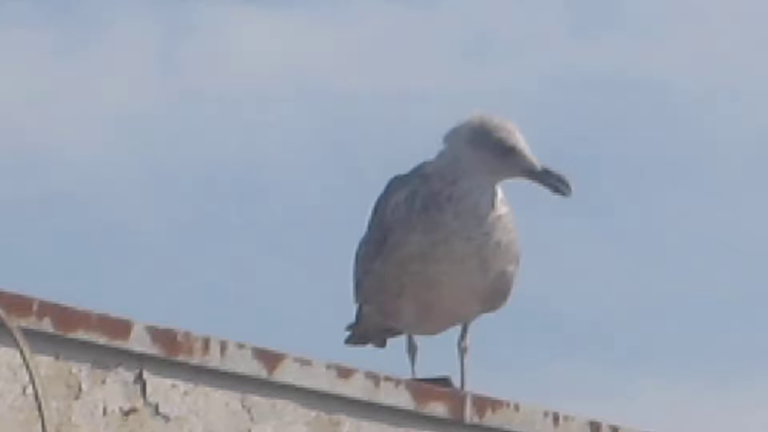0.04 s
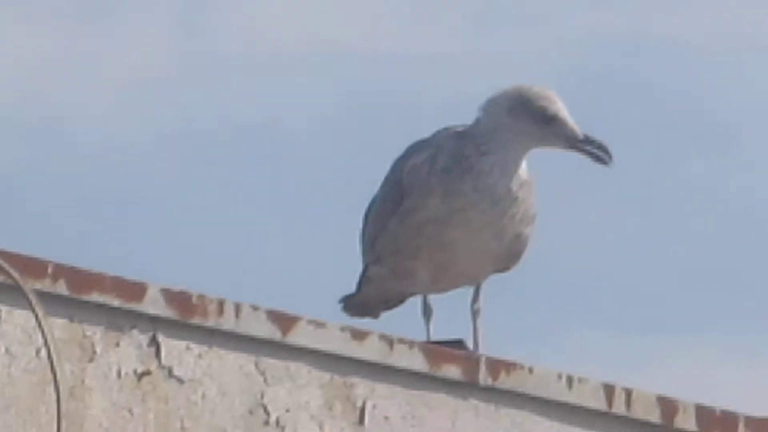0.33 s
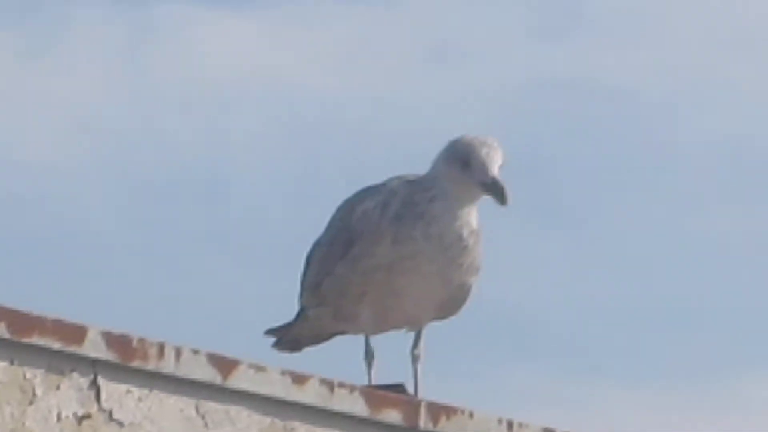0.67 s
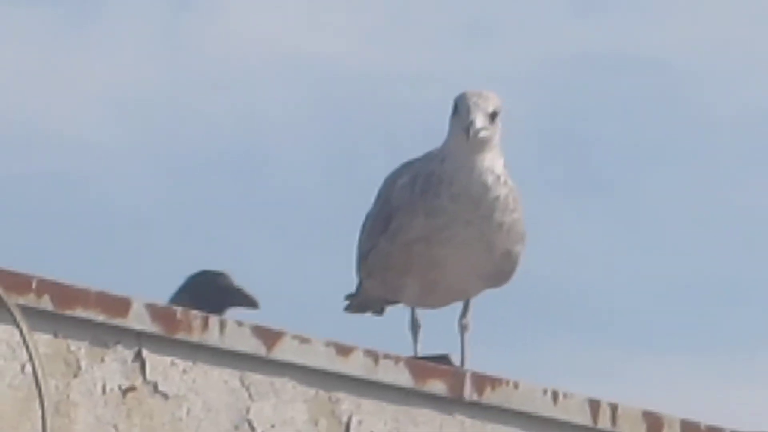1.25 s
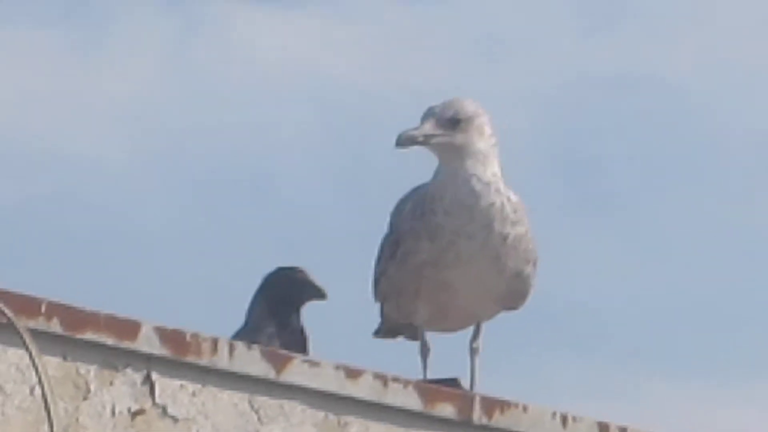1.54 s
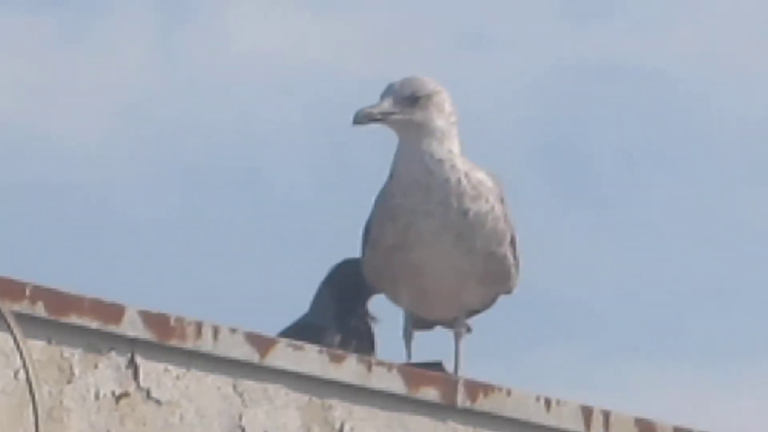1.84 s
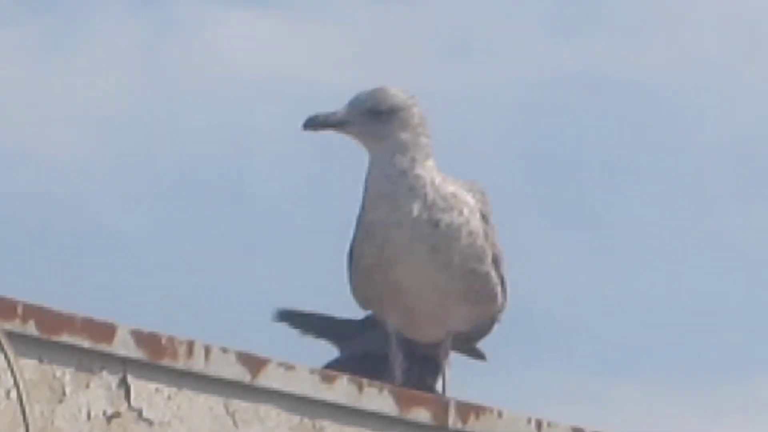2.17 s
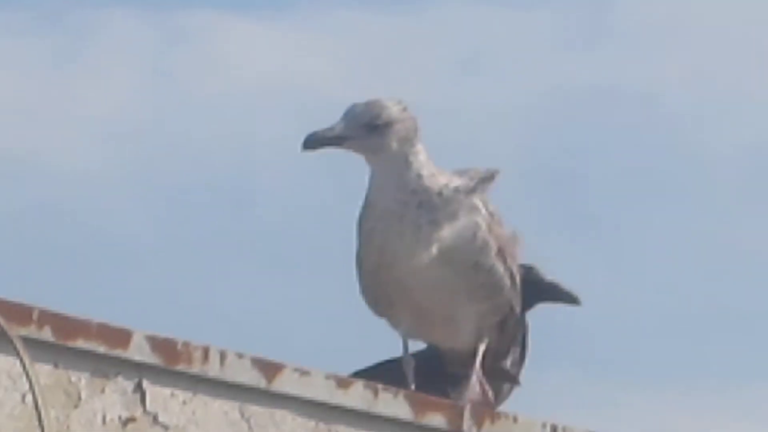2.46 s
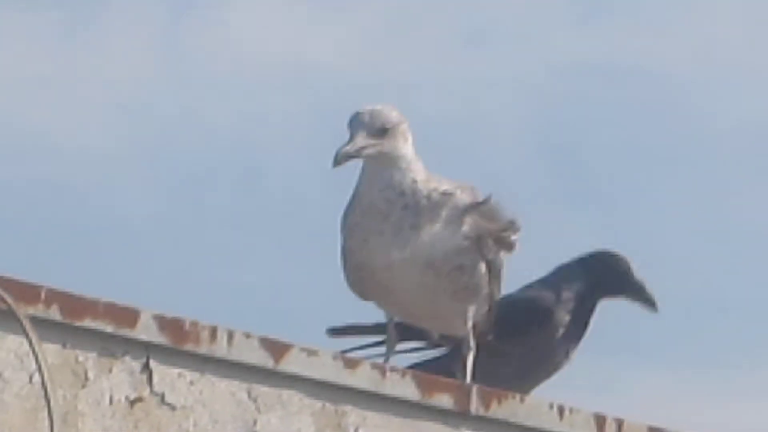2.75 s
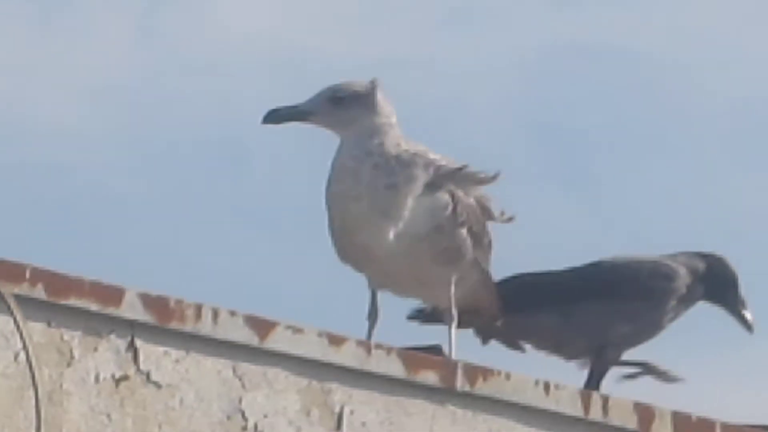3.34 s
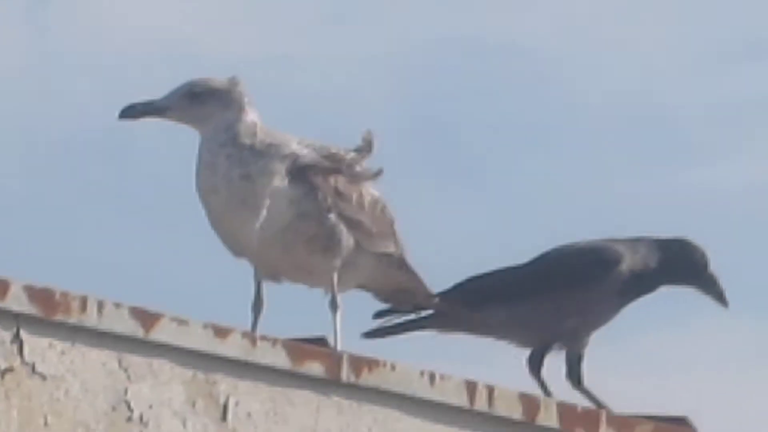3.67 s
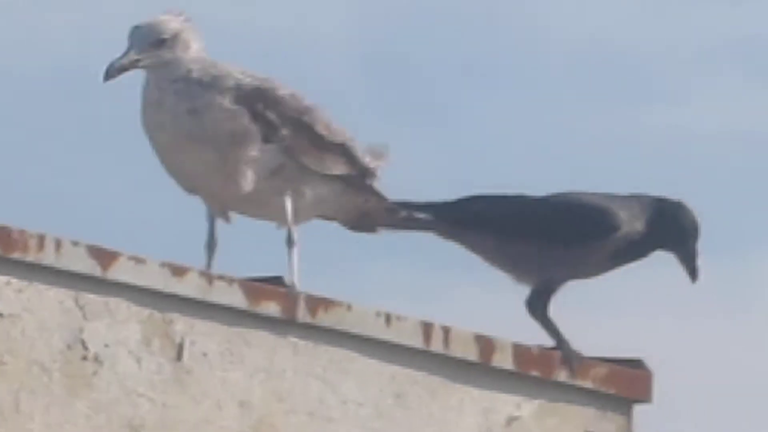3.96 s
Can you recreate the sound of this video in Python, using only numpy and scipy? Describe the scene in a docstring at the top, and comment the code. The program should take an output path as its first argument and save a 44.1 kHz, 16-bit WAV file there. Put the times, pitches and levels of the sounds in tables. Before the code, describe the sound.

Outdoors among rooftops, a young gull squeals in a shrill, breaking voice. Gusts then rumble and thump right on the microphone, and the gull squeals once more through them, with faint hiss and far-off noise behind.

```python
"""Among rooftops, with the microphone out in the wind. A young gull on a roof gives two thin squeals; its voice
breaks from one register to the next, rasping at the breaks, and the buildings echo it. Right at the microphone,
gusts shed eddies, the hardest of them overloading it. Behind lie a distant outdoor wash and a fine hiss; the
whole background sinks for a moment after the hardest buffets."""
import sys
import numpy as np
from scipy import signal
from scipy.fft import rfft, irfft
from scipy.io import wavfile
from scipy.ndimage import uniform_filter1d

SR = 44100
rng = np.random.default_rng(int(sys.argv[2]) if len(sys.argv) > 2 else 0)


def pcm_store(signal):
    """Save signal as 16-bit PCM."""
    levels = np.round(np.clip(np.atleast_2d(signal), -1, 1) * 32767)
    wavfile.write(sys.argv[1], SR, levels.astype(np.int16).T)


N = 176400
T = np.arange(N) / SR
CUTOFF_HZ = 15800   # top of the microphone's range

# The gull on its roof, register by register. Each row: start and end in seconds, pitch at start, middle
# and end in Hz, levels of harmonics 1-4 in dB, level change over the note in dB, roughness from 0 to 1.
REGISTERS = [ (0.27, .289, 3400, 3980, 3980, -52.5, -44, -78, -95, 0, 0.47),
             (0.299, 0.324, 3900, 3840, 3815, -30, -57, -77, -95, 14, 0.091),
             (0.322, 0.347, 3780, 3740, 3640, -34, -35, -72, -85, -3, 0),
             (0.341, .358, 1492, 1442, 1425, -70, -36, -34.5, -46, 6, 0.26),
             (.355, .404, 2827, 2810, 2777, -31, -45, -62, -64, -1, 0),
             (.356, .402, 1420, 1410, 1405, -80, -55, -50, -70, 3, 0.1),
             (0.407, 0.561, 4757, 4700, 4665, -31.5, -57.5, -70, -101, -2, .04),
             (.563, .660, 4055, 4033, 4020, -30, -49.5, -79, -90, 7.5, 0.09),
             (0.659, 0.778, 3520, 3472, 3440, -27, -45.5, -60, -62, -6.5, 0.029),
             (0.789, 0.801, 4050, 3940, 3830, -47, -41, -78, -95, -2, .25),
             (0.814, 0.828, 3700, 3370, 3380, -50, -37, -78, -95, 9, 0.13),
             (0.84, 0.865, 1343, 1322, 1340, -70, -29, -34.5, -51, 1, 0.13),
             (.870, 0.897, 1322, 1250, 1225, -75, -33, -40, -66, 8.5, 0.18),
             (2.428, 2.444, 3330, 3670, 4130, -47, -42, -49, -86, 16.5, 0.75),
             (2.444, 2.463, 3137, 3154, 3177, -29.5, -34.5, -46.5, -79, -6, 0.069),
             (2.471, 2.521, 3200, 3090, 2940, -39, -57, -73, -82, 10, 0.15),
             (2.471, 2.521, 3900, 3840, 3710, -33, -54, -62, -80, 9.5, 0.16),
             (2.501, 2.517, 4240, 4170, 4140, -29, -49, -75, -97, -9, 0.23),
             (2.519, 2.553, 2950, 2940, 2990, -45, -44, -51, -76, 1, .25),
             (2.549, 2.608, 4680, 4790, 4750, -45, -48.5, -73, -95, 1.5, 0.017),
             (2.617, 2.68, 4850, 4900, 4850, -42, -62.5, -78, -95, -2.5, 0),
             (2.679, 2.722, 4190, 4155, 4100, -40, -53.5, -69.5, -95, -14.5, 0.02),
             (2.719, 2.821, 4090, 4040, 4110, -60, -54.5, -95, -100, -15.5, 0.085),
             (2.829, 2.925, 4530, 4410, 4240, -65.5, -55.5, -101.5, -100, 7.5, 0.28),
             (2.916, 2.99, 4260, 3880, 3200, -67.5, -67.5, -90.5, -100, -20, 0.11)]
def gull_squeals():
    """Each register is a gliding tone with a few harmonics; roughness shakes its pitch and strength."""
    attack_s, release_s, throat_top_hz = 0.0076, 0.016, 15000
    out, jitter, shimmer, waver = np.zeros(N), wander(hz=500), wander(hz=500), wander(hz=45)
    for start, end, hz0, hz1, hz2, db1, db2, db3, db4, change_db, rough in REGISTERS:
        on = (T > start - attack_s) & (T < end + release_s)
        t = T[on]
        progress = np.clip((t - start) / (end - start), 0, 1)
        glide = np.polyval(np.polyfit([0, .5, 1], [hz0, hz1, hz2], 2), progress)
        hz = glide * (1 + 0.021 * rough * jitter[on] + 0.00089 * waver[on])
        phase = 2 * np.pi * np.cumsum(hz) / SR
        gate = np.clip(.5 + (t - start) / attack_s, 0, 1) * np.clip(.5 + (end - t) / release_s, 0, 1)
        envelope = np.sin(gate * np.pi / 2) ** 2 * from_db(change_db * (progress - .5))
        envelope *= 1 + rough * shimmer[on]
        for k, db in enumerate([db1, db2, db3, db4, db4 - 3, db4 - 6], 1):
            if k * hz1 < CUTOFF_HZ:
                throat_loss = np.sqrt(1 + (k * hz / throat_top_hz) ** 8)
                out[on] += envelope * from_db(db) * np.sin(k * phase) / throat_loss
    return out


# Breaks in the voice. Each row: time in seconds, half length in seconds, level in dB.
VOICE_BREAKS = [(.353, 0.0058, -41.5), (.407, .005, -44.5), (.565, 0.0035, -53), (2.444, .007, -46),
                (2.513, 0.018, -47), (2.548, .007, -60.5), (2.832, 0.0028, -53.5)]
# Colour of the rasp. Each row: frequency in Hz, relative level in dB.
RASP_SPECTRUM = [(1800, -41), (2900, -13.5), (4200, 1), (6500, 0.5), (8500, -12), (11000, -14),
                 (15000, -31)]
def gull_rasps():
    """A short burst of noise where the voice breaks between registers."""
    return swells(VOICE_BREAKS) * noise(RASP_SPECTRUM)


# The same bird's side tones, and faint tones at the sum of two overlapping pitches. Each row: start and end in
# seconds, first and last pitch in Hz, level in dB.
SIDE_TONES = [(0.336, 0.356, 6600, 6500, -43), (0.358, 0.399, 7050, 7000, -43),
              (.385, 0.426, 3730, 3540, -41), (.409, 0.428, 8370, 8280, -48), (.43, 0.57, 3800, 3650, -58),
              (.49, 0.552, 2880, 2830, -54), (0.612, 0.646, 3540, 3510, -46),
              (0.614, 0.663, 7650, 7500, -52), (0.623, 0.68, 2870, 2810, -49.5),
              (2.519, 2.556, 6650, 6550, -47.5), (2.52, 2.54, 8120, 8150, -49),
              (2.54, 2.562, 7680, 7650, -46), (2.801, 2.838, 3600, 3520, -54.5)]
def gull_side_tones():
    """The other half of the syrinx sounds weak glides along with the main voice; where two voices overlap, a
    faint tone sounds at the sum of their pitches."""
    fade_s = 0.004
    out, shake = np.zeros(N), 1 + 0.0044 * wander(hz=500)
    for start, end, hz0, hz1, db in SIDE_TONES:
        on = (T > start - fade_s) & (T < end + fade_s)
        t = T[on]
        gate = np.clip(.5 + np.minimum(t - start, end - t) / fade_s, 0, 1)
        hz = np.interp(t, [start, end], [hz0, hz1]) * shake[on]
        out[on] += from_db(db) * gate * np.sin(2 * np.pi * np.cumsum(hz) / SR)
    return out


# Slaps off the neighbouring buildings. Each row: delay in seconds, level against the direct call in dB.
WALL_ECHOES = [(.16, -27), (.28, -30)]
def rooftops(call):
    """The call arrives with quick scatter from the roof, then dull slaps and a tail from the walls."""
    roof_decay_s, tail_t60_s = 0.027, 1.1
    t = T[:SR]
    roof = rng.standard_normal(SR) * np.exp(-t / roof_decay_s) * (t > .004)
    tail = rng.standard_normal(SR) * from_db(-60 * t / tail_t60_s) * (t > .025)
    echo = from_db(-16) * roof / np.linalg.norm(roof) + from_db(-26.5) * tail / np.linalg.norm(tail)
    dull = butter(call, 5000, "low")
    slaps = sum(from_db(db) * np.interp(T - delay, T, dull) for delay, db in WALL_ECHOES)
    return call + signal.fftconvolve(call, echo)[:N] + slaps


def eddy(t, hz):
    """Pressure of a vortex passing the microphone: a sharp trough between two soft shoulders."""
    u = (2 * np.pi * hz * t) ** 2
    return (u - 1) / (1 + u) ** 2


# Gusts right on the microphone. Each row: time in seconds, half length in seconds, strength in dB.
GUSTS = [(.55, .015, -58), (1.125, 0.03, -24), (1.172, 0.0072, -17), (1.283, 0.037, -20),
         (1.425, 0.026, -19), (1.49, 0.036, -24), (1.595, 0.017, -25.5), (1.672, 0.02, -19.5),
         (1.755, 0.03, -40.5), (1.985, 0.026, -16), (2.047, 0.003, -20), (2.175, 0.054, -36),
         (2.255, 0.036, -24), (2.36, 0.037, -30), (2.465, 0.019, -20.5), (2.54, 0.032, -16),
         (2.605, 0.019, -13.5), (2.69, 0.044, -17.5), (2.78, 0.033, -21), (2.865, 0.022, -17),
         (2.93, 0.034, -19), (3.04, 0.0041, -23.5), (3.10, 0.028, -21), (3.218, 0.015, -18),
         (3.27, 0.018, -19), (3.325, 0.046, -17), (3.418, 0.015, -14.5), (3.525, 0.017, -15.5),
         (3.572, 0.028, -15.5), (3.665, 0.056, -20.5), (3.735, 0.026, -21.5), (3.788, 0.0098, -16),
         (3.835, 0.016, -16), (3.89, 0.031, -18.5), (3.965, 0.06, -15.5)]
# Eddy sizes. Each row: centre in Hz, level against a reference gust in dB, growth in dB per dB of gust.
EDDY_SIZES = [(36.4, -16, 0.2), (72, -4.5, 1.4), (127, -4, 0.81), (209, -4, 1.47), (324, -9.5, 2.52),
              (545, -18, 3.02)]
def gusts():
    """Eddies of all sizes pass at random as lopsided troughs; strong gusts favour the small ones."""
    eddies_per_s, spread_db, lean_spread, reference_db, smooth_s = 150, 4.5, 0.94, -14.5, .035
    strength = swells(GUSTS) / from_db(reference_db)
    t, out = T[:SR // 10] - T[SR // 20], np.zeros(N)
    for hz, db, growth in EDDY_SIZES:
        passes = (rng.random(N) < eddies_per_s / SR) * from_db(spread_db * rng.standard_normal(N))
        leans = lean_spread * rng.standard_normal(N)
        u = 2 * np.pi * hz * t
        troughs = signal.fftconvolve(passes, eddy(t, hz), "same")
        swings = signal.fftconvolve(passes * leans, 2 * u / (1 + u ** 2) ** 2, "same")
        churn = rms_one(troughs + swings)
        power = uniform_filter1d(churn ** 2, int(smooth_s * SR))
        even_churn = churn / np.sqrt(power + 0.016)   # evened out, so the gust sets the level
        out += from_db(reference_db + db) * strength ** growth * even_churn
    return out


# The hardest single buffets. Each row: time in seconds, peak ahead of the port in dB, centre in Hz.
BUFFETS = [(1.121, -10.5, 168), (1.137, -13, 216), (1.174, -11.5, 252), (1.25, -10, 217), (1.205, -14, 325),
           (1.272, -4.5, 278), (1.282, -3, 155), (1.315, -13, 232), (1.437, 0, 352), (1.442, -9.5, 596),
           (1.666, -14, 550), (1.953, -4, 390), (1.97, -9.5, 580), (1.985, -0.5, 390), (2.021, -19, 417),
           (2.046, -15.5, 248), (2.25, -19, 324), (2.587, -2.5, 260), (2.605, -0.5, 300), (2.616, -4, 600),
           (2.673, -10, 520), (2.723, -11.5, 650), (2.862, -9.5, 418), (2.935, -14, 330), (3.091, -15, 297),
           (3.209, -13, 220), (3.22, -6.5, 241), (3.264, -2, 278), (3.324, -1.5, 430), (3.340, -7, 750),
           (3.425, -16, 435), (3.570, -10, 520), (3.667, -11.5, 380), (3.826, -1, 465), (3.873, -8.5, 700),
           (3.888, -5, 650), (3.95, -9, 690)]
# Low rumble of the breeze between gusts. Each row: frequency in Hz, relative level in dB.
BREEZE_SPECTRUM = [(20, -7.5), (50, 1.5), (110, -0.5), (170, -11), (260, -27.5)]
# Its rise and fall. Each row: time in seconds, level in dB.
BREEZE_LEVEL = [(.1, -66), (.5, -61), (1.0, -42), (1.2, -47), (1.9, -38.5), (2.6, -36.5), (3.2, -35.5),
                (3.46, -50.5), (4.0, -39.5)]
def wind():
    """Breeze, gusts and buffets press on the microphone's port, which passes mainly the low end."""
    port_low_hz, port_high_hz = 36.4, 1644
    breeze = level(BREEZE_LEVEL) * noise(BREEZE_SPECTRUM)
    buffets = sum(from_db(db) * eddy(T - s, hz) for s, db, hz in BUFFETS)
    pressure = butter(breeze + gusts() + buffets, port_low_hz, "high", order=1)
    return butter(pressure, port_high_hz, "low", order=3)


# Colours of the hiss and the rustles behind the gull. Each row: frequency in Hz, relative level in dB.
HISS_SPECTRUM = [(2000, -17), (4000, 3), (7000, -0.5), (10000, -1.5), (12500, -2.5), (15500, -9.5)]
RUSTLE_SPECTRUM = [(2000, -9.5), (4000, 5), (7000, -3.5), (11000, -1.5), (13000, -9.5), (15500, -19)]
# Rise and fall of the hiss. Each row: time in seconds, level in dB.
HISS_LEVEL = [(.07, -66), (.3, -65.5), (.52, -61), (.64, -58.5), (.75, -53), (.85, -56), (.91, -50.5),
              (.97, -57), (1.1, -55), (1.18, -59.5), (1.235, -47.5), (1.31, -58.5), (1.43, -54.5),
              (1.45, -70), (1.59, -61), (1.67, -67), (1.75, -58), (1.84, -68), (1.95, -54.5), (2.0, -68),
              (2.09, -67), (2.14, -50.5), (2.21, -65.5), (2.37, -55), (2.55, -84), (2.65, -68), (2.9, -76),
              (3.25, -66.5), (3.45, -77), (4.0, -76)]
# Single rustles. Each row: time in seconds, half length in seconds, level in dB.
RUSTLES = [(1.538, 0.0052, -55.5), (3.024, .007, -57), (3.365, 0.0081, -59), (3.502, 0.011, -59),
           (3.73, .008, -58.5), (3.897, 0.0063, -57)]
def fine_hiss():
    """Treble noise rises and falls, dropping for a moment after the hardest buffets, with brief high rustles."""
    return level(HISS_LEVEL) * noise(HISS_SPECTRUM) + swells(RUSTLES) * noise(RUSTLE_SPECTRUM)


# The outdoors, far from the microphone. Each row: frequency in Hz, relative level in dB.
WASH_SPECTRUM = [(25, -14), (55, 2.5), (100, -2), (170, -4.5), (300, -5), (550, -7), (1000, -7),
                 (1600, -14.5), (2500, -22), (3600, -29.5), (5000, -35)]
# Its rise and fall, with brief drops after the hardest buffets. Each row: time in seconds, level in dB.
WASH_LEVEL = [(.07, -41), (.3, -40), (.7, -37), (1.43, -38), (1.45, -47.5), (1.85, -41), (1.98, -39.5),
              (2.0, -44), (2.4, -42.5), (2.6, -38), (2.75, -47), (3.2, -42.5), (3.45, -50), (4.0, -50.5)]
def distant_wash():
    """Dull, far-off noise carrying a faint, wavering high whine."""
    whine_hz = 7870 * (1 + .005 * wander(hz=130))
    whine = from_db(-32) * np.sin(2 * np.pi * np.cumsum(whine_hz) / SR)
    return level(WASH_LEVEL) * (noise(WASH_SPECTRUM) + whine)


def from_db(db):
    """Decibels to gain."""
    return 10 ** (np.asarray(db) / 20)


def rms_one(x):
    """Scale to unit rms."""
    return x / np.sqrt(np.mean(x ** 2) + 1e-20)


def level(rows):
    """Gain over time from points in seconds and dB."""
    return from_db(np.interp(T, *np.transpose(rows)))


def swells(rows):
    """Gain over time from bell-shaped swells, added in power."""
    power = sum(from_db(db) ** 2 * np.exp(-((T - s) / width) ** 2) for s, width, db in rows)
    return np.sqrt(power + 1e-14)


def butter(x, hz, kind, order=2):
    """Butterworth filter."""
    return signal.sosfilt(signal.butter(order, hz, kind, fs=SR, output="sos"), x)


def wander(hz):
    """Random motion up to the given rate, rms 1."""
    return rms_one(butter(rng.standard_normal(N + SR), hz, "low")[SR:])


def noise(spectrum):
    """Noise of a given colour, rolled off at the top, rms 1."""
    hz, db = np.transpose(spectrum)
    bins = np.maximum(np.fft.rfftfreq(N, 1 / SR), 1)
    colour = from_db(np.interp(np.log(bins), np.log(hz), db))
    top_loss = np.sqrt(1 + (bins / hz[-1] / 0.85) ** 8)
    return rms_one(irfft(rfft(rng.standard_normal(N)) * colour / top_loss, N))


def scene():
    """One microphone: the gull across the rooftops, wind close up, hiss and wash behind."""
    gull = gull_squeals() + gull_rasps() + gull_side_tones()
    return (rooftops(gull) + wind() + fine_hiss() + distant_wash())[None]


def record(dry):
    """The microphone opens after a moment, the hardest buffets overload it, and the top is cut."""
    open_s, fade_s, overload = .071, 0.0025, .7
    opened = dry * np.clip((T - open_s) / fade_s, .01, 1)
    clipped = opened / (1 + (opened / overload) ** 12) ** (1 / 12)
    return signal.sosfilt(signal.ellip(10, .1, 80, CUTOFF_HZ, fs=SR, output="sos"), clipped)


dry = scene()
out = record(dry)
pcm_store(out)
```